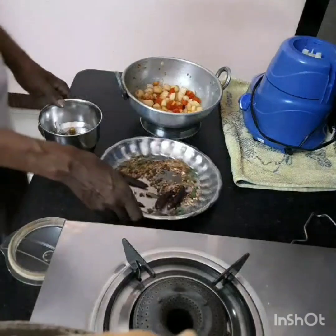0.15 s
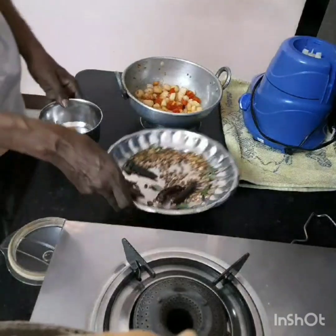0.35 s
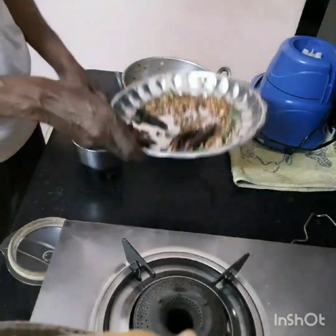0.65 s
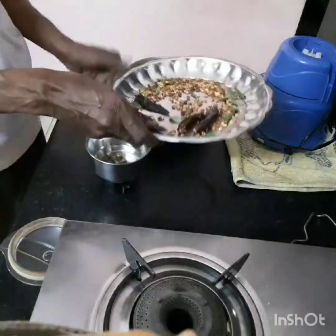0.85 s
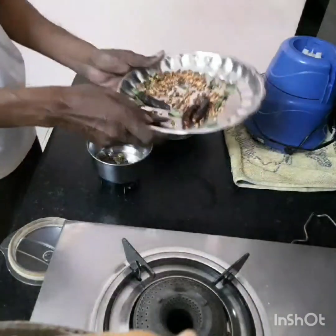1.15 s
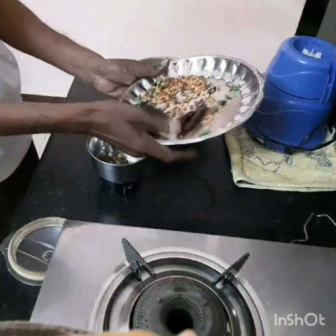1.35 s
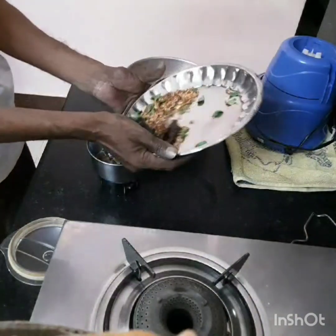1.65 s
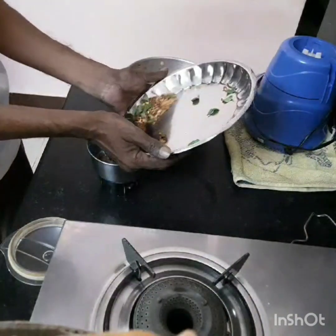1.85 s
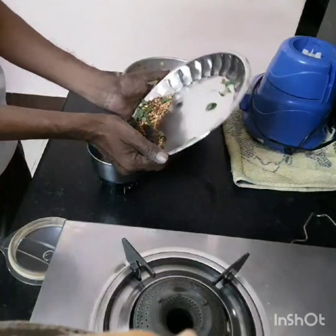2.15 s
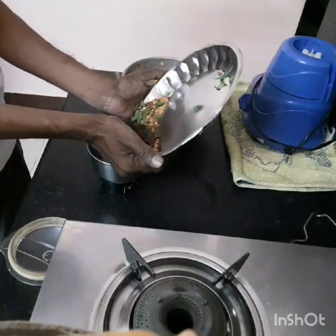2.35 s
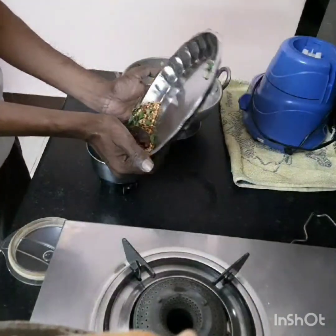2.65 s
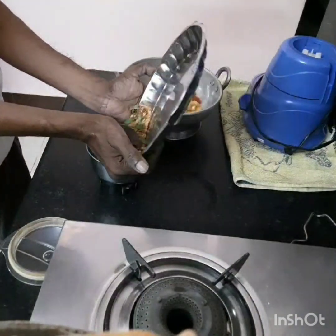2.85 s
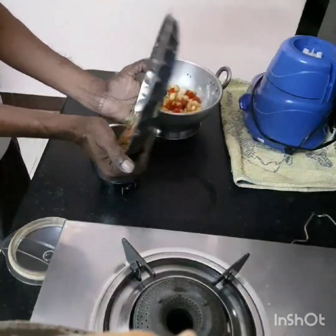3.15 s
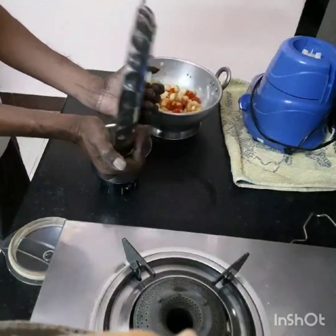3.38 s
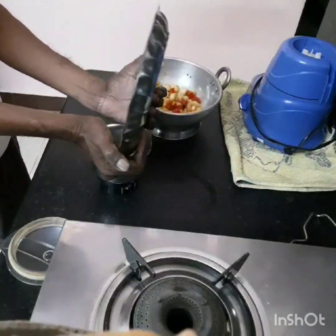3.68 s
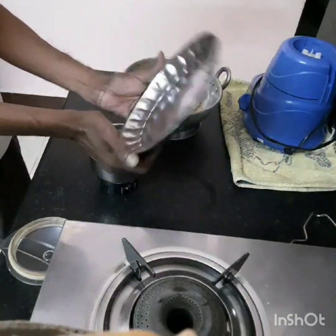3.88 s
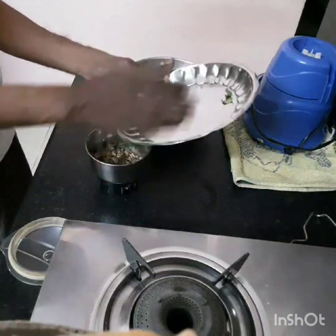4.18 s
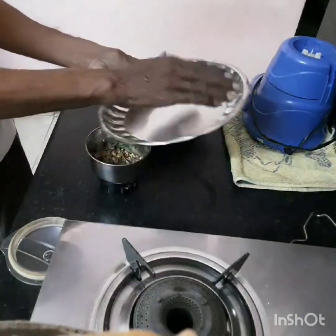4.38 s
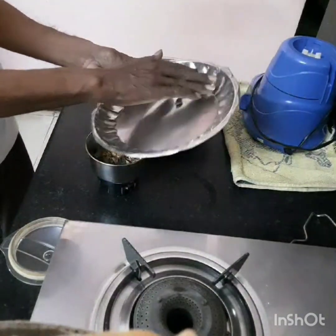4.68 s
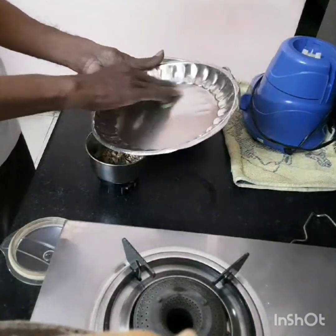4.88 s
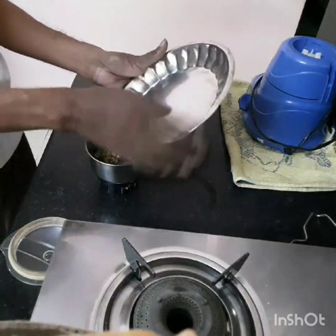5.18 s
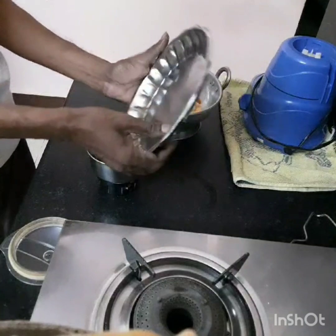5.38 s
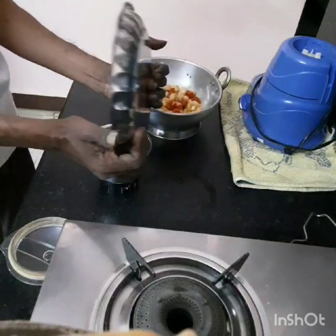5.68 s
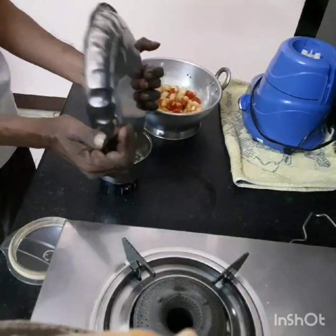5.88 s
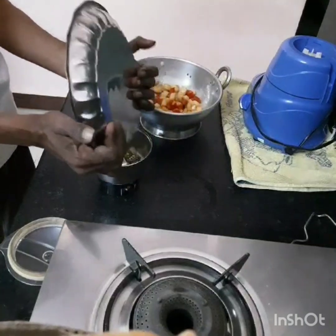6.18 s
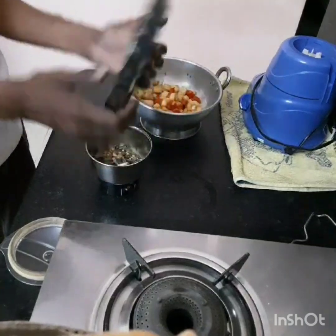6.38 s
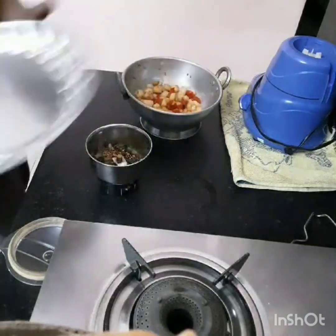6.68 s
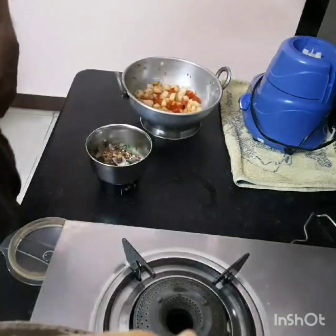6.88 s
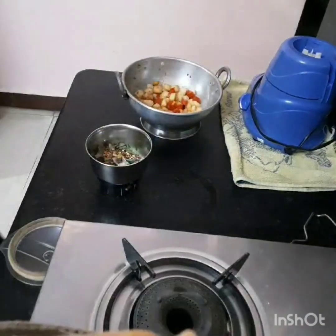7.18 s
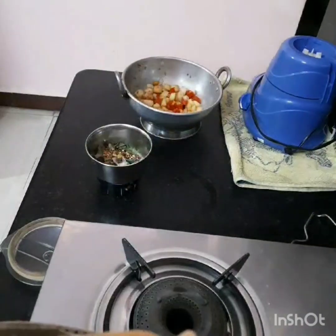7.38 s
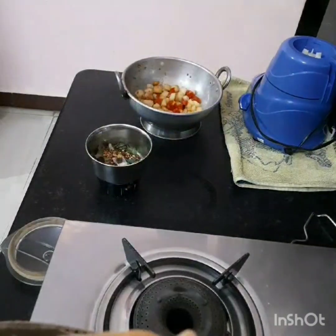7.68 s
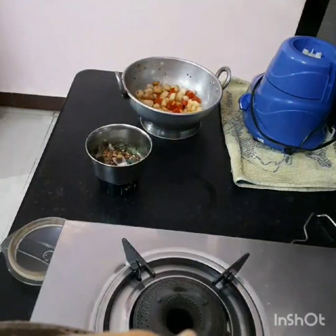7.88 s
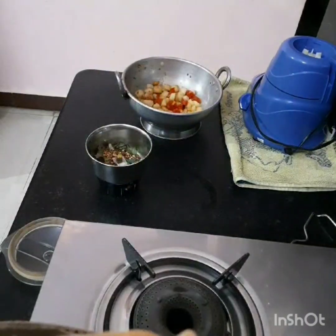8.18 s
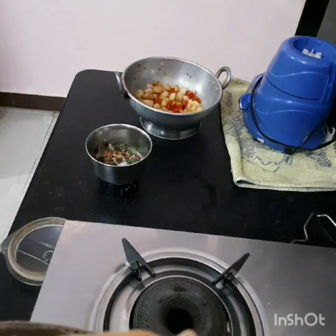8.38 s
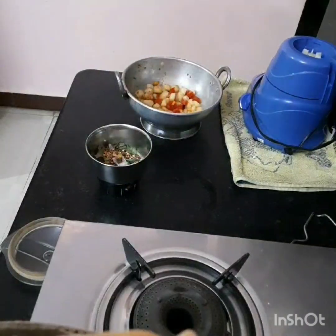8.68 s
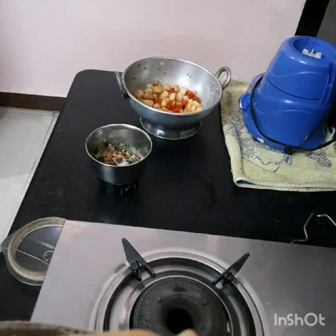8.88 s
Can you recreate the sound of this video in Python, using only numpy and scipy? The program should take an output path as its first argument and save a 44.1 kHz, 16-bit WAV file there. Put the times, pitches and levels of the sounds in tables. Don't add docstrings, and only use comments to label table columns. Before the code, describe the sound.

Close stereo phone pickup in a hard kitchen with low hum. Metal drags and chatters on stone, grains slide in dry bright rushes, single seeds crack on steel, and a dense pour rings the jar. Quieter swipes and ringing ticks follow, then deep hollow plate knocks, soft cloth rustle, and a farther double clank as the plate is set down.

```python
import sys
import numpy as np
from scipy import signal
from scipy.fft import rfft, irfft, next_fast_len
from scipy.io import wavfile
from scipy.ndimage import uniform_filter1d, map_coordinates

SR = 44100
rng = np.random.default_rng(int(sys.argv[2]) if len(sys.argv) > 2 else 0)


def generate_wav(signal):
    frames = np.transpose(np.atleast_2d(signal))
    scaled = np.clip(frames, -1, 1) * 32767
    pcm = np.round(scaled).astype(np.int16)
    wavfile.write(sys.argv[1], SR, pcm)


def to_linear_factor(level_db):
    exponent = np.asarray(level_db, float) / 20
    return 10 ** exponent


N = 398663
TIME = np.arange(N) / SR


def curve(rows):
    return to_linear_factor(np.interp(TIME, *np.array(rows).T))


def walk(rate_hz, count=N):
    k = int(SR / rate_hz)
    held = np.repeat(rng.standard_normal(count // k + 1), k)
    return 1.99 * uniform_filter1d(uniform_filter1d(held, k), k)[:count]


def below(hz, edge_hz):
    s = 1j * hz / edge_hz
    return 1 / (1 + np.sqrt(2) * s + s * s) ** 2


def body_response(body, broad_db, size):
    colour, resonances = body
    hz = np.maximum(np.fft.rfftfreq(size, 1 / SR), 1)
    colour_hz, colour_db = np.array(colour).T
    level_db = np.interp(np.log(hz), np.log(colour_hz), colour_db) + broad_db
    cep = irfft(np.log(to_linear_factor(level_db)))
    cep[1:size // 2] *= 2
    cep[size // 2 + 1:] = 0
    modes = [to_linear_factor(db) / (1 + 2j * (hz - f) / (width + 0.0038 * f)) for f, width, db in resonances]
    return hz, [np.exp(rfft(cep))] + modes


def effort(strokes, motion, col, t):
    swell_s, *fades_db_per_s = motion
    power = 0
    for s, length, db, *share_db in strokes:
        swell = np.clip((t - s) / min(swell_s, length), 0, 1) ** 0.81
        fade_db = fades_db_per_s[col] * np.maximum(t - s - length, 0)
        power = power + (swell * to_linear_factor(db + (share_db + [0])[col] - fade_db)) ** 2
    return np.sqrt(power)


def contact(strokes, motion, body, hits, rate_hz, scatter_db, edges_hz=(1600,), broad_db=-5, spot_db=0.0,
            tick_size=5):
    start = int(strokes[0][0] * SR) - 441
    span_s = strokes[-1][0] - strokes[0][0] + 1.2
    size = 2 * next_fast_len(int(span_s * SR) // 8192 * 4096)
    t = (start + np.arange(size)) / SR
    hz, modes = body_response(body, broad_db, size)
    grains = (rng.random(size) < rate_hz / SR) * rng.standard_normal(size)
    grains *= to_linear_factor(scatter_db * np.minimum(rng.exponential(size=size), 4))
    grains *= to_linear_factor(0.73 * walk(30, count=size))
    bounces = rng.standard_normal(size)
    spots = [1] + [to_linear_factor(spot_db * walk(13.95, count=size)) for _ in modes[1:]]
    lows = [below(hz, edge) for edge in edges_hz] + [1]
    highs = [1] + [np.conj(below(1 / hz, 1 / edge)) for edge in edges_hz]
    out = 0
    for col, (low, high) in enumerate(zip(lows, highs)):
        push = grains / np.std(grains) * effort(strokes, motion, col, t)
        bright = col == len(edges_hz)
        for s, peak_db, *share_db, t60 in hits:
            since = t - s
            tick = tick_size * bright * np.exp(-np.abs(since) / 0.0012)
            bounce = to_linear_factor(-60 * np.abs(since) / t60) * bounces + tick * np.sign(bounces)
            push += to_linear_factor(peak_db + (share_db + [0])[col] - 14.5) * (since >= 0) * bounce
        norm = np.sqrt(np.mean(sum(np.abs(m * low * high) ** 2 for m in modes)))
        rung = sum(rfft(push * spot) * m for spot, m in zip(spots, modes))
        out = out + low * high / norm * rung
    return np.pad(irfft(out), (start, N))[:N]


# (frequency [Hz], t60 [s])
KITCHEN_DECAY = [(97.6, 0.48), (243.8, 0.5), (557, 0.39), (1410, 0.43), (4600, 0.36), (8500, 0.36),
                 (14600, 0.29)]
PORT_LIKENESS = [.76, .9, .45, 0, 0, 0, 0]


def alike(count):
    hz = np.fft.rfftfreq(count, 1 / SR)
    band_hz = np.array(KITCHEN_DECAY)[:, 0]
    for k, ((_, t60), same) in enumerate(zip(KITCHEN_DECAY, PORT_LIKENESS)):
        share = np.interp(np.log(hz + 1), np.log(band_hz), np.arange(len(band_hz)) == k)
        mid, side = irfft(share * rfft(rng.standard_normal((2, count))), count)
        yield np.sqrt(1 + same) * mid + np.sqrt(1 - same) * side * np.array([[1], [-1]]), t60


# (frequency [Hz], level [dB/Hz])
AIR_COLOUR = [(15, -31.5), (25, -7.5), (105, -11), (206, -8), (242, -36), (309, -11), (384, -21.5),
              (575, -25), (1400, -33.5), (1520, -38), (3340, -41), (16000, -37)]
# (frequency [Hz], width [Hz], level [dB])
MAINS_HUM = [(52.5, 18, -1.5), (100, 6.3, 2.5), (196, 2.8, -3.5)]
# (time [s], level [dB])
BASS_LEVEL = [(0, -77), (.12, -73), (.22, -57.5), (1.2, -64.5), (2.4, -63), (3.9, -67.5), (4.6, -68.5),
              (5.7, -81), (6.6, -60), (7.2, -77.5), (8.5, -64.5), (9.04, -83.5)]
# (time [s], level [dB])
HISS_LEVEL = [(0, -64), (.25, -64), (.6, -68.5), (9.04, -68.5)]


def air():
    hz, parts = body_response((AIR_COLOUR, MAINS_HUM), 0.57, size=8192)
    noise = sum(band for band, _ in alike(count=N))
    low = 1 / (1 + 1j * hz / 300) ** 2
    bass = signal.oaconvolve(noise, irfft(sum(parts) * low)[None])[:, :N]
    hiss = signal.oaconvolve(noise, irfft(sum(parts) * (1 - low))[None])[:, :N]
    bass_gain = curve(BASS_LEVEL) * to_linear_factor(0.56 * walk(7.4))
    hiss_gain = curve(HISS_LEVEL) * to_linear_factor(1.4 * walk(3.7))
    return (bass * bass_gain + hiss * hiss_gain) / np.std(bass)


# (time [s],
# frequency [Hz], level [dB], t60 [s], beat [Hz])
RINGS = [(0, 3070, -83, 6, 7), (2.908, 8220, -33.5, 0.08, 30), (3.514, 8060, -34.5, 0.32, 40),
                    (3.526, 8180, -23, 0.064, 60), (3.526, 9100, -29, .05, 60), (3.524, 13210, -42, 0.33, 90),
                    (3.516, 12400, -46, .15, 70), (4.596, 3330, -50, .2, 50), (5.115, 7150, -42, .08, 200),
                    (5.158, 7070, -38, 0.079, 190), (3.6, 6180, -68, 1.2, 16), (4.595, 2870, -45, 0.13, 41),
                    (4.993, 2860, -48.5, 0.12, 35), (4.7, 2870, -60, .9, 14), (4.858, 2400, -60, .25, 21),
                    (5.19, 2870, -54, .35, 40), (5.262, 2870, -56, .3, 30), (5.065, 4300, -59, .35, 60),
                    (5.06, 2470, -62, .6, 21), (5.498, 2490, -75, 0.26, 30), (6.2, 973, -42, 0.6, 9.1),
                    (7.955, 1567, -56, 0.7, 6),
                    (7.76, 2130, -42.5, 0.55, 20),
         (7.759, 1180, -53, 0.55, 15),
         (8.025, 2525, -54, .4, 11),
         (7.8, 2500, -46, .25, 30),
         (7.79, 4330, -53, .4, 25),
         (7.96, 4270, -50, .15, 30),
         (7.8, 102, -47.5, 2.1, 1.57),
         (7.93, 340, -45, 0.17, 10),
         (7.955, 3000, -45, .15, 30),
                    (3.114, 2290, -23, 0.044, 45), (3.088, 6900, -27, .06, 130), (3.14, 6760, -30, 0.046, 150),
              (3.314, 7000, -28, .05, 150), (3.344, 6900, -22, .04, 150), (3.417, 7000, -33, .05, 150),
              (3.424, 198.5, -42, 0.17, 8.6), (3.43, 600, -42, 0.13, 17), (4.012, 2480, -68, .2, 24),
              (4.012, 3270, -68, 0.21, 22), (5.815, 201, -45.5, .25, 8.9), (6.056, 200, -34.5, 0.29, 6.5),
              (6.178, 203, -33, .28, 8)]


def rings():
    out = np.zeros(N)
    for s, hz, db, t60, beat_hz in RINGS:
        part = out[int(s * SR):][:int(t60 * SR)]
        t = TIME[:len(part)]
        level = to_linear_factor(db - 60 * t / t60) * (1 - np.exp(-t / .002))
        beat = 1 + 0.4 * np.cos(2 * np.pi * beat_hz * t)
        part += level * beat * np.sin(2 * np.pi * hz * t)
    return out


# (time [s], length [s], level [dB], deep share [dB])
DRAG_STROKES = [(.16, 0.1, -65, 2),
                (.208, .14, -34.5, -8.5)]
# (frequency [Hz], width [Hz], level [dB])
DRAG_BODY = [(71, -58.5), (120, -18), (580, -7), (822, -10), (1210, -14), (1900, -9.5), (6370, -9.5),
             (14700, -19), (16000, -42)], [(352, 21, -12), (610, 60, -11), (1220, 140, -3.5),
             (2705, 100, -4)]


def drag():
    return contact(DRAG_STROKES, (0.17, 155, 120), DRAG_BODY, [], rate_hz=11000, scatter_db=-1.5,
                   broad_db=3.5, spot_db=-0.5)


# (time [s], pitch [Hz], level [dB], overtone [dB])
CHATTER_TONES = [
    [(.2, 650, -68, -20), (.22, 670, -54, -29), (.27, 700, -48.5, -6), (.3, 639.7, -42.5, 0.5),
     (.33, 605, -42.5, 5), (.4, 600, -54, 1), (.45, 600, -64, -9), (.55, 590, -68, -6)],
    [(.62, 629, -58, -15), (.66, 610, -52, -17), (.72, 551, -45.5, -21), (.8, 509.4, -44.5, -13),
     (.91, 485, -41.5, -12), (.95, 500, -45, -10), (1.05, 521, -48, -15), (1.12, 487, -69, -12)],
]


def chatter(rows):
    table = np.array(rows)
    s, hz, db, over_db = (np.interp(TIME, table[:, 0], col) for col in table.T)
    phase = 2 * np.pi * np.cumsum(hz * (1 + 0.0202 * walk(120.4))) / SR
    on = (TIME > rows[0][0]) & (TIME < rows[-1][0])
    tone = to_linear_factor(2.4 * walk(60)) * np.sin(phase)
    octave = to_linear_factor(over_db + 3.2 * walk(60)) * np.sin(2 * phase)
    return on * to_linear_factor(db) * (tone + octave)


# (time [s], length [s], level [dB], deep share [dB])
SHOVE_STROKES = [(.6, 0.38, -43, 0),
                 (.87, 0.038, -39.5, -18),
                 (1.1, 0.056, -55.5, -23)]
# (frequency [Hz], width [Hz], level [dB])
SHOVE_BODY = [(88, -68), (150, -24.5), (504, -11), (1480, -30), (2180, -18), (4080, -25), (7040, -21.5),
              (14800, -30.5), (16000, -44)], [(205, 10, -19), (333, 14, 3), (500, 70, -6.5),
              (2180, 130, -14), (990, 98, -9), (2380, 780, -10.5)]


def shove():
    return contact(SHOVE_STROKES, (0.17, 106, 98), SHOVE_BODY, [], rate_hz=6000, scatter_db=-2.5,
                   broad_db=11, spot_db=1.0)


# (time [s], length [s], level [dB], deep share [dB])
SLIDE_STROKES = [(1.21, 0.14, -40.5, -15),
                 (1.548, .035, -46, -15),
                 (1.56, 0.24, -41.5, -15.5),
                 (1.86, 0.16, -39, -16),
                 (2.395, 0.195, -48, -19),
                 (2.55, 0.17, -56, -16)]
# (frequency [Hz], width [Hz], level [dB])
SLIDE_BODY = [(120, -51.5), (200, -43.5), (380, -24), (579, -19), (1420, -20), (2470, -2), (3900, -2.5),
              (7010, -2.5), (12600, -1.5), (16000, -17)], [(5600, 49, -9), (6130, 680, -8), (7020, 290, -3)]
# (time [s], peak [dB], deep share [dB], t60 [s])
SLIDE_HITS = [
    (2.2102, -50, -35, 0.1),
    (2.316, -50, -30, .2),
    (2.3902, -50, -30, 0.1),
    (2.446, -42, -30, 0.15),
    (2.496, -49.5, -14.5, 0.19),
]


def slide():
    return contact(SLIDE_STROKES, (0.11, 120, 130), SLIDE_BODY, SLIDE_HITS, rate_hz=11000, scatter_db=0.3,
                   tick_size=1.5)


# (time [s], peak [dB], lowest frequency [Hz], decay [s])
CRACKS = [(2.2116, -40, 5500, .002), (2.3153, -47, 4500, .004), (2.3897, -43, 5000, .002),
          (2.4455, -37, 2500, .002), (2.4785, -46, 5000, .002), (2.4964, -34, 3000, .004),
          (2.7128, -35, 2500, .002), (2.8385, -19, 5500, .0015), (2.9597, -35, 1500, .003),
          (3.0306, -23, 4000, .002), (3.087, -25, 5000, .003), (3.1134, -23, 800, .0015),
          (3.639, -35, 1000, .002), (4.9775, -42, 3500, .002), (5.1158, -27, 5500, .002),
          (5.16, -26, 5500, .003), (5.0628, -41, 5500, .003), (5.0947, -38, 5500, .002)]


def cracks():
    out = np.zeros(N)
    t = np.arange(2048) / SR
    for s, db, low_hz, decay_s in CRACKS:
        burst = rng.standard_normal(len(t)) * to_linear_factor(db - 4) * np.exp(-t / decay_s)
        high_pass = signal.butter(3, low_hz, "high", fs=SR, output="sos")
        out[int(s * SR):][:len(t)] += signal.sosfilt(high_pass, burst)
    return out


# (time [s], length [s], level [dB], deep share [dB], wall share [dB])
TRICKLE_STROKES = [(2.712, .004, -40, -19, -17.5),
                   (2.836, 0.0051, -36, -20.5, -14),
                   (2.93, .09, -38, -18, -9.5),
                   (3.03, 0.064, -32, -18, -8.5)]
# (frequency [Hz], width [Hz], level [dB])
TRICKLE_BODY = [(88, -54), (150, -23.5), (979, -13.5), (1530, -29.5), (3040, -10), (3700, -24), (5300, -23),
                (6910, -8.5), (10000, -12.5), (15100, -11.5), (16000, -23.5)], [(340, 24, -16),
                (6920, 210, -6.5), (8980, 150, -11)]
# (time [s], peak [dB], deep share [dB], wall share [dB], t60 [s])
TRICKLE_HITS = [
    (2.7125, -30, -33, -27, 0.1),
    (2.7472, -33.5, -35, -28.5, 0.089),
    (2.785, -33.5, -23, -28, 0.1),
    (2.727, -34, -30, -25, .04),
    (2.839, -18, -26, -17, 0.035),
    (2.85, -24.5, -30, -25, .04),
    (2.9093, -33, -32, -22.5, 0.1),
    (3.0303, -18.5, -31, -22, 0.066),
    (3.0869, -28, -24, -9, 0.093),
]


def trickle():
    return contact(TRICKLE_STROKES, (.18, 40, 60, 95), TRICKLE_BODY, TRICKLE_HITS, rate_hz=5900,
                   scatter_db=1.5, edges_hz=(1800, 4500), spot_db=2.0, tick_size=5.7)


# (time [s], length [s], level [dB], deep share [dB], wall share [dB])
POUR_STROKES = [(3.11, 0.14, -32, -16.5, -3),
                (3.27, 0.13, -37.5, -15.5, -2),
                (3.39, 0.14, -38, -12, -3)]
# (frequency [Hz], width [Hz], level [dB])
POUR_BODY = [(100, -42), (200, -7), (700, -8.5), (1300, -6.5), (1800, -9.5), (2600, -6), (4000, -8),
             (7000, -5.5), (14400, -8.5), (16000, -22)], [(337.7, 18, -7), (1030, 150, -7), (2260, 190, -7),
             (1120, 140, -10), (6850, 490, -10.5), (8610, 150, -18.5)]
# (time [s], peak [dB], deep share [dB], wall share [dB], t60 [s])
POUR_HITS = [
    (3.114, -17, -8.5, 6.5, 0.068),
    (3.526, -27, -23.5, -15.5, 0.1),
    (3.638, -37.5, -22, 16, 0.073),
]


def pour():
    return contact(POUR_STROKES, (0.02, 75.4, 96, 100), POUR_BODY, POUR_HITS, rate_hz=4500, scatter_db=0.0,
                   edges_hz=(1800, 4500), spot_db=2.5)


# (time [s], peak [dB], upper mode share [dB])
JAR_TICKS = [(3.112, -21, -6), (3.124, -29.5, -6.5), (3.137, -28.5, -6), (3.141, -28.5, -7),
             (3.164, -29, -7), (3.176, -26.5, -6.5), (3.185, -29, -6), (3.194, -28.5, -5.5),
             (3.202, -29, -8.5), (3.213, -23, -6), (3.224, -29.5, -6.5), (3.232, -29.5, -6),
             (3.24, -25.5, -7.5), (3.246, -27.5, -5.5), (3.252, -24.5, -6.5), (3.259, -25, -6),
             (3.268, -29, -6.5), (3.28, -27, -6.5), (3.286, -31.5, -6), (3.296, -31.5, -6),
             (3.304, -34, -5), (3.31, -32.5, -7), (3.318, -29.5, -7), (3.334, -30.5, -6),
             (3.361, -33.5, -7.5), (3.367, -32, -5), (3.39, -32.5, -6), (3.403, -30.5, -7),
             (3.417, -31, -5), (3.433, -29, -6), (3.463, -30, -4), (3.486, -33, -5.5), (3.509, -30.5, -5.5),
             (3.544, -34.5, -6), (3.575, -42, -6), (3.589, -36, -12), (3.639, -32, -10)]
# (frequency [Hz], level [dB], t60 [s])
JAR_MODES = [(1002, -4, .03), (1100, -9, .025), (2290, 0.5, .025), (2390, -7, .02), (3700, -11.5, 0.014)]


def jar_ticks():
    out = np.zeros(N)
    t = np.arange(4096) / SR
    for s, peak_db, upper_db in JAR_TICKS:
        wall = 0
        for hz, db, t60 in JAR_MODES:
            weight, detune = rng.standard_normal(2)
            mode_db = db + 3.7 * weight + (upper_db + 6.5) * (hz > 1500)
            tone = np.sin(2 * np.pi * hz * (1 + .015 * detune) * t)
            wall = wall + to_linear_factor(mode_db - 60 * t / t60) * tone
        out[int((s + .001) * SR):][:len(t)] += to_linear_factor(peak_db - 6) * wall
    return out


# (time [s], level [dB], t60 [s])
HEAP_LANDING = [
    (3.42, -33, 0.1),
]


def thump():
    s, db, t60 = HEAP_LANDING[0]
    since = np.maximum(TIME - s, 0)
    burst = np.minimum(since / 0.0096, 1) * to_linear_factor(db - 60 * since / t60) * rng.standard_normal(N)
    return 6 * signal.sosfilt(signal.butter(2, (140, 520), "band", fs=SR, output="sos"), burst)


# (time [s], length [s], level [dB], deep share [dB])
RUSTLE_STROKES = [
    (4.007, 0.017, -59.5, -12.5),
    (4.234, 0.094, -94.5, 26.5),
    (6.517, .18, -53, -6.5),
    (6.785, 0.12, -71.5, 3),
    (7.032, 0.07, -65, -27),
    (7.268, 0.042, -97.5, 32.5),
    (7.368, 0.073, -89, 23),
    (7.445, 0.07, -66, 1.5),
    (8.978, 0.046, -73, -18),
]
# (frequency [Hz], width [Hz], level [dB])
RUSTLE_BODY = [(120, -30), (200, 1), (1080, -9), (1420, -23.5), (2420, -9), (4950, -12), (7010, -12.5),
               (13600, -22), (16000, -25)], [(2470, 89, -10.5), (3220, 140, -24), (6670, 155, -13)]


def rustle():
    spells = RUSTLE_STROKES[:2], RUSTLE_STROKES[2:7], RUSTLE_STROKES[7:]
    return sum(contact(spell, (0.23, 130, 128), RUSTLE_BODY, [], rate_hz=5500, scatter_db=-1.0)
               for spell in spells)


# (time [s], length [s], level [dB], deep share [dB], wall share [dB])
SWEEP_STROKES = [
    (4.6, 0.079, -82, 21, -10),
    (4.68, 0.37, -62.5, -34, -2),
    (5.06, 0.071, -58, -8, 3.5),
    (5.13, 0.16, -48, -41, -7.5),
    (5.36, .44, -74, -19, -5),
]
# (frequency [Hz], width [Hz], level [dB])
SWEEP_BODY = [(88, -50), (150, -11), (286, -7), (1700, -18), (2810, -0.5), (4860, -3), (7040, -5.5),
              (13200, -6.5), (16000, -18)], [(279, 44, -9), (2480, 41, -10), (2870, 47, -1.5),
              (4300, 150, -7), (6670, 95, -6), (7030, 80, -4)]
# (time [s], peak [dB], deep share [dB], wall share [dB], t60 [s])
SWEEP_HITS = [(4.595, -39, 2, 11, 0.45), (4.7635, -41.5, -18, 0.5, 0.09), (4.863, -37.5, -47, -4, 0.17),
              (4.9778, -34, -23, -14, 0.074), (4.994, -52, 8, 19, 0.18), (5.0628, -29, -21.5, -7, 0.13),
              (5.0948, -40, -33, -21, 0.081), (5.116, -28, -27, -30, 0.059), (5.16, -29, -36, -17, 0.088),
              (5.497, -44.5, -28, -6, 0.16), (5.555, -47.5, -21, -2, 0.15), (5.6416, -50, -5, -4, 0.16)]


def sweep():
    return contact(SWEEP_STROKES, (0.078, 170, 280, 380), SWEEP_BODY, SWEEP_HITS, rate_hz=5000,
                   scatter_db=1.5, edges_hz=(1800, 5800), spot_db=2.5, tick_size=1.2)


# (time [s], length [s], level [dB], deep share [dB], wall share [dB])
KNOCK_STROKES = [
    (5.802, 0.05, -68.5, 21.5, -3),
    (5.94, 0.02, -53, -3, -13),
    (6.052, 0.014, -73.5, 39, 20),
    (6.165, 0.043, -59, 26.5, 11.5),
    (6.22, 0.067, -71.5, 26, -3),
    (6.31, 0.071, -71.5, 21, -2),
    (6.4, 0.11, -72.5, 5, -2),
]
# (frequency [Hz], width [Hz], level [dB])
KNOCK_BODY = [(29, -45), (68, -15), (97, 5), (135, -27), (198, -4.5), (398, -3), (927, -3), (1330, -15.5),
              (7390, -25), (14500, -32.5), (16000, -38)], [(198, 25, -2), (333, 37, -9), (490, 23, -21),
              (773, 46, -13), (891, 35.7, -40), (2450, 150, -14.5)]
# (time [s], peak [dB], deep share [dB], wall share [dB], t60 [s])
KNOCK_HITS = [
    (5.81, -38.5, 8.5, 12, 0.35),
    (5.939, -37, -28, 0.5, 0.13),
    (6.0498, -31.5, 3, 10.5, 0.21),
    (6.083, -46, 14, 9, 0.11),
    (6.173, -28.5, 14, 11, 0.076),
    (6.202, -39, 18, 14.5, .1),
    (6.249, -44, 14, 0, .1),
]


def knock():
    return contact(KNOCK_STROKES, (0.03, 193, 147, 200), KNOCK_BODY, KNOCK_HITS, rate_hz=5800,
                   scatter_db=3.5, edges_hz=(1800, 5000))


# (time [s], length [s], level [dB], deep share [dB])
STOW_STROKES = [(7.754, 0.076, -44, 1.5),
                (7.94, 0.016, -44.5, 2)]
# (frequency [Hz], width [Hz], level [dB])
STOW_BODY = [(29, -49), (75, -20), (103, -2), (175, -11), (277, -8), (586, -11.5), (729, -14), (2880, -1),
             (12300, -23), (14900, -38), (16000, -52)], [(114.5, 36, -9), (2164, 46, -9), (2494, 120, -13),
             (2870, 72, -12), (3300, 27, -22), (4330, 98, -19)]
# (time [s], peak [dB], deep share [dB], t60 [s])
STOW_HITS = [
    (7.7568, -25, -4, 0.13),
    (7.922, -33, 8.5, 0.18),
    (7.955, -26.5, -26, 0.25),
]


def stow():
    return contact(STOW_STROKES, (0.0057, 157, 290), STOW_BODY, STOW_HITS, rate_hz=4000, scatter_db=1.5,
                   spot_db=4.0, tick_size=0.67)


# (frequency [Hz], level [dB], t60 [s])
ROOM_MODES = [(99.9, -55.5, 0.49), (203, -48, 0.3), (346, -69.5, 0.13)]


def kitchen(x):
    t = np.arange(SR) / SR
    tail = sum(band * np.exp(-np.log(1000) * t / t60) for band, t60 in alike(count=SR))
    tail *= 1 - np.exp(-t / 0.0013)
    tail /= np.sqrt(np.sum(tail ** 2) / 2)
    boom = sum(to_linear_factor(db - 60 * t / t60) * np.sin(2 * np.pi * hz * t) for hz, db, t60 in ROOM_MODES)
    return signal.oaconvolve(x[None], tail + boom)[:, :N]


def ports(x, lag, spread=2.24):
    place = np.arange(N) - lag - spread * walk(70)
    return np.array([map_coordinates(x, [place], order=3), x])


def lean(pan_db):
    return to_linear_factor(np.array([[pan_db / 2], [-pan_db / 2]]))


def scene():
    # (sound, direct [dB], echo [dB], left lag [samples], left minus right [dB], own lag spread [samples])
    placed = [(rings(), 0.1, -16, 0, -.6, .3),
              (drag(), -5, -4, -1, -.5),
              (chatter(CHATTER_TONES[0]), -3, -8, -1, -.5),
              (shove(), -5, -4, 8, -1.2),
              (chatter(CHATTER_TONES[1]), -3, -8, 8, -1.2),
              (slide(), -5, -4, -2, .6),
              (trickle(), -5, -4, -4, 1.6),
              (pour(), -5, -4, -3, .6),
              (jar_ticks(), -2, -12, -3, .6),
              (thump(), -3, -10, -3, -.6),
              (rustle(), -5, -6, -6, -2.2),
              (sweep(), -5, -4, -3, 1.2),
              (knock(), -5, -4, -5, -1.8),
              (stow(), -6, -3, -10, -2.4)]
    direct = sum(to_linear_factor(near_db) * lean(pan_db) * ports(x, lag, *spread)
                 for x, near_db, _, lag, pan_db, *spread in placed)
    echoes = kitchen(sum(x * to_linear_factor(echo_db) for x, _, echo_db, *_ in placed))
    room = direct + lean(-0.5) * echoes + lean(-4.5) * air()
    ticks = cracks()
    return room + ports(ticks, -3) + to_linear_factor(-7) * kitchen(ticks)


def band_limit(x):
    return signal.sosfilt(signal.butter(12, 16670, fs=SR, output="sos"), x)


def record(dry):
    dry = signal.sosfilt(signal.butter(4, 52, "high", fs=SR, output="sos"), dry)
    loudness = np.sqrt(uniform_filter1d(np.mean(dry ** 2, axis=0), size=220) + 1e-12)
    dry = dry * np.minimum(to_linear_factor(-27.0) / loudness, 1) ** .6
    dry = signal.sosfilt(signal.ellip(8, .3, 60, 15500, fs=SR, output="sos"), dry)
    return band_limit(dry)


dry = scene()
out = record(dry)
generate_wav(out)
```